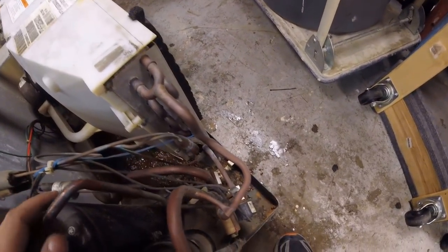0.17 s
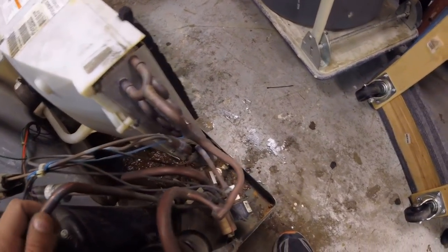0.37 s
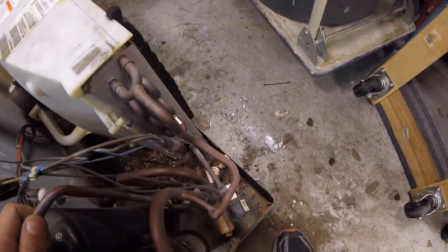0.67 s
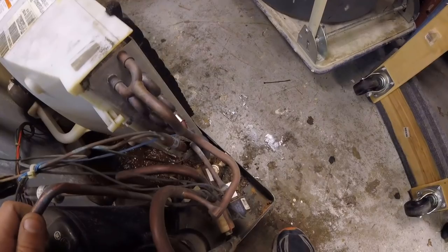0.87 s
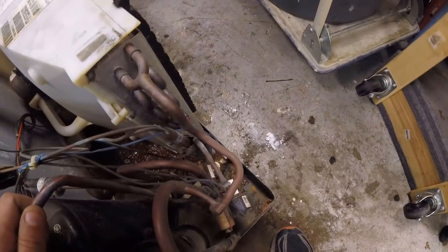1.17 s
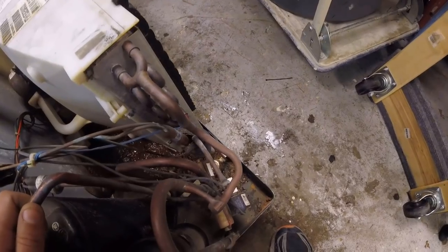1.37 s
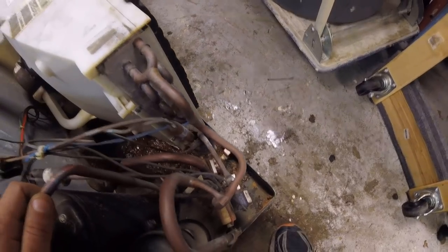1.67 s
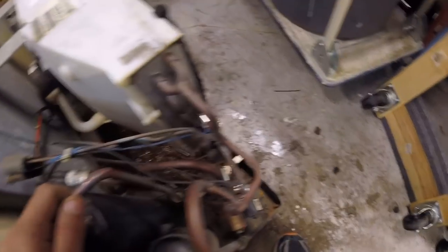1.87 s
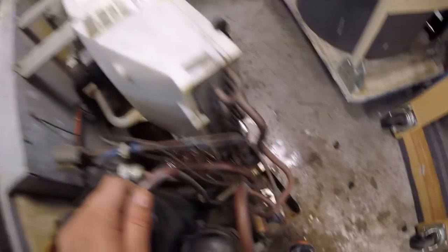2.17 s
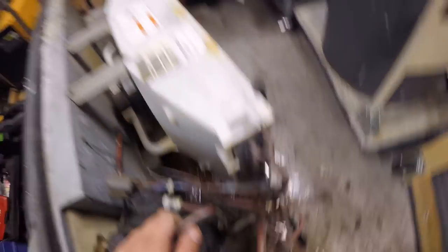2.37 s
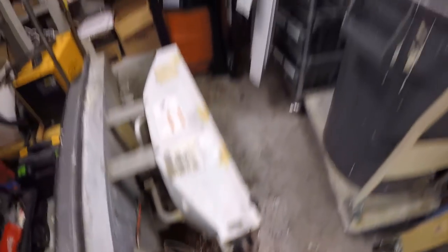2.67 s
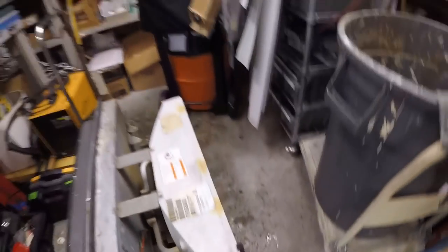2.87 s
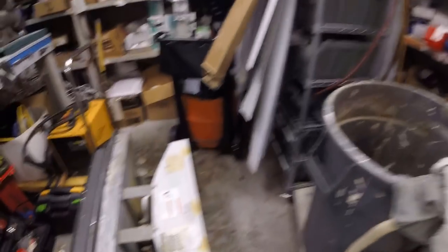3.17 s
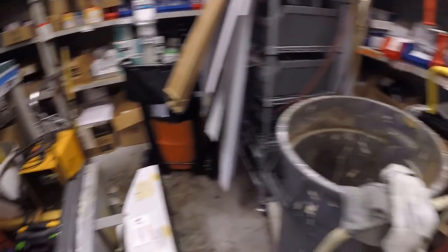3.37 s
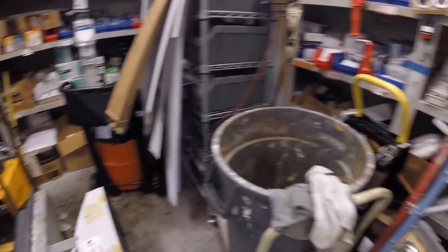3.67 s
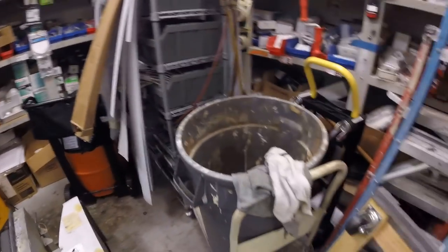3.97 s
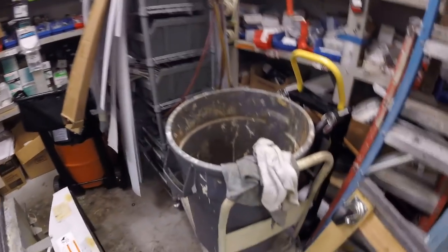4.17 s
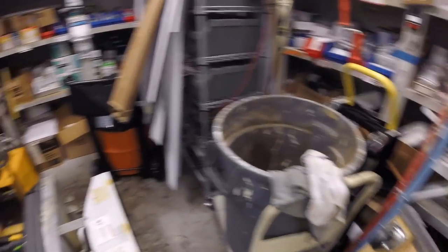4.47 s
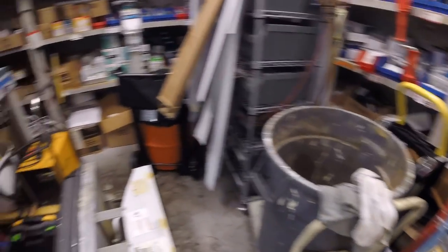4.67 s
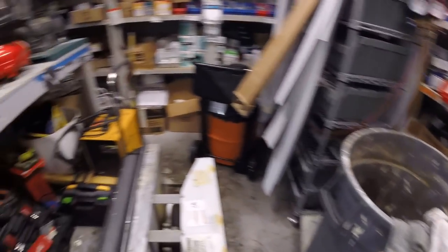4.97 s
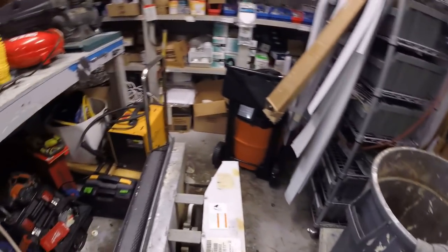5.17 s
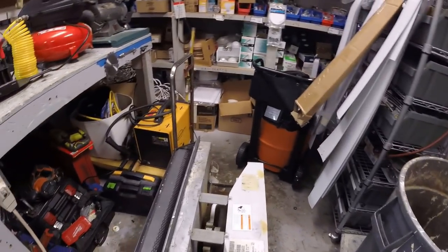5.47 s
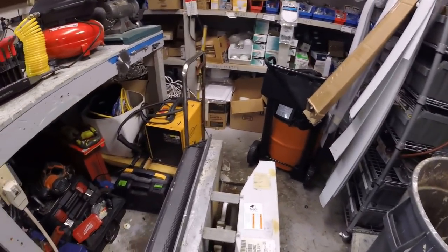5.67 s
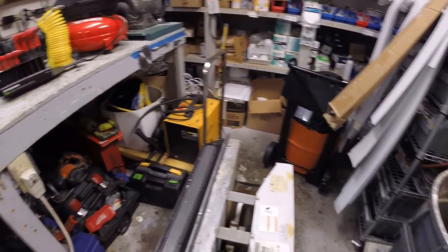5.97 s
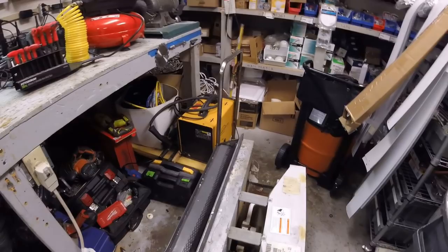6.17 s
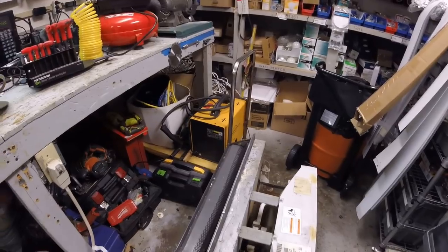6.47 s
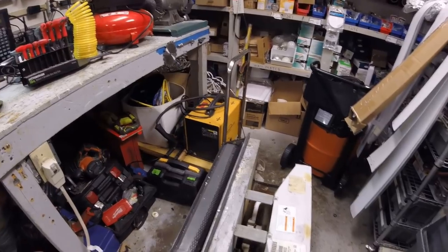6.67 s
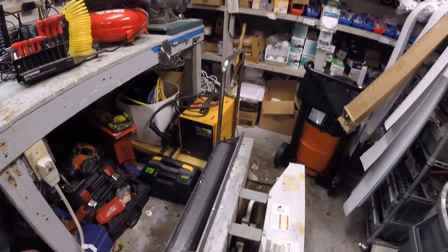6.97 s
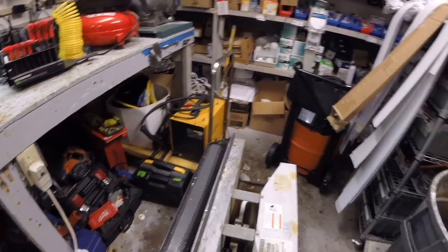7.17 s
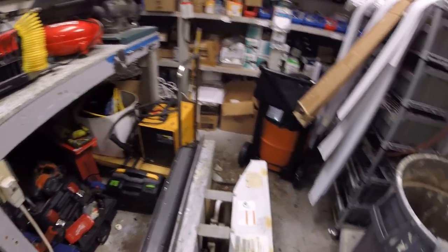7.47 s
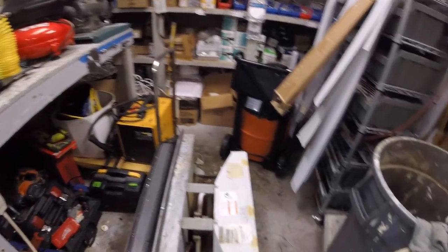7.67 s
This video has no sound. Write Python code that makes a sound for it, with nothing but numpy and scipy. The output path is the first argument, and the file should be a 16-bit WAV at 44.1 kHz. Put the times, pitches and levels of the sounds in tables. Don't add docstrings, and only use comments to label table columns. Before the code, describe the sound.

An opened air conditioner runs continuously for about 7.8 seconds on a workshop floor. Its fan makes a low, rough hum throbbing about 27 times a second; the compressor adds a faster buzz near 58 strokes a second, its valve blows ringing copper pipes and steel shell with a hard metallic rattle. Broad air rush and a finer pulsing hiss surround both. From 0 to 1.8 seconds the head-worn microphone is bent close, the sound bright and detailed. Between 2 and 3 seconds it rises: the timbre slides, a faint airy swish peaks near 2.7, and a tiny soft wind puff lands around 2.85, letting in a trace of low rumble that fades over the next seconds. From 3 to 5 seconds, turned aside, the pipe ring changes colour and the rattle is softer. After 5.25, standing, the drone stays steady, slightly duller, wavering subtly to the end.

```python
import sys
import numpy as np
from scipy import signal
from scipy.fft import rfft, irfft
from scipy.io import wavfile
from scipy.ndimage import uniform_filter1d, map_coordinates

SR = 44100
rng = np.random.default_rng(int(sys.argv[2]) if len(sys.argv) > 2 else 0)


def wrap_up_sound(samples):
    columns = np.atleast_2d(samples).T
    tamed = np.clip(columns, -1, 1)
    steps = np.round(tamed * 32767).astype(np.int16)
    wavfile.write(sys.argv[1], SR, steps)


def invert_db(x):
    u = np.asarray(x, float) / 20
    return 10 ** u


N = 344421
T = np.arange(N) / SR
FAN_HZ, PUMP_HZ = 27.24, 58.39
SHELL_DB = (-38.5, -39, -43, -43.5)


# multiple of the turning rate,
# then level in dB bent over, rising, turned aside, standing.
BLADES = [(5, -17.5, -29, -15.5, -22.5), (6, 1, -1, -3, -4), (7, -2.5, 0, -34, -30),
          (8, -26, -7.5, -9.5, -3.5), (9, 3, 1.5, 1.5, 0.5), (10, 1, 1, -3.5, 5.5),
          (11, -38, -26, -44, -34), (12, -3.5, -3, -1.5, -0.5), (13, -29, -24, -22, -17),
          (14, -11, -13, -12, -36), (15, -27, -15, -8.5, -8.5), (16, -32, -30, -15.5, -29),
          (17, -23, -32, -11.5, -47), (18, -8.5, -18, -26, -29)]


def fan():
    table = np.array(BLADES)
    orders = np.arange(len(table)) + 5
    delay_turns = -0.045 * orders + 0.0052 * (orders - 9) ** 2
    bunch = np.exp(-2j * np.pi * delay_turns)

    def voice(place):
        return by_place(table[:, 1:], place) * bunch

    throb = turning(orders, voice, FAN_HZ, echo=.2, unsteady=.002)[1]
    level_db = heard((-26, -24.5, -28, -24.5)) - 3.0 + 0.14 * wobble(8.5)
    return invert_db(level_db) * throb


# frequency in Hz, width in
# Hz, then level in dB bent over, rising, turned aside, standing.
MODES = [(610, 54, -17, -23, -2, -17), (700, 60, 6, -1, 8, 5.5), (884, 190, 2, 0.5, -4, -10),
         (1050, 62, -6, 1, 4.5, 0.5), (1106, 58, 10.5, 8.5, 6.5, 2), (1226, 166, 5, 5, 3.5, -3.5),
         (1613, 200, -3, -3.5, -1.5, -4), (1930, 88, -1, -10, -3, -11), (2167, 85, 3, -1.5, 0, -4),
         (2395, 170, 1, -4.5, -4, -7), (2926, 210, -2, -3, -1.5, -6),
         (3255, 90, -10, -5, -2, -2), (3330, 110, -6, -8, -8, -10), (3595, 103, 1, 3, 6.5, -4),
         (3628, 130, 2.5, 3, -14, -8.5), (3775, 110, 5, -11, -9, 2.5), (3863, 100, -2.5, -3, 2, 4),
         (4043, 90, 1, -1, 5, 0.5), (4235, 132, 4.5, -9, -1, -6), (4314, 35, -21, -7, -10, -14),
         (4580, 100, -4, -7, -7, -5.5), (4900, 200, -9, -22, -13, -37), (5146, 143, -2, -10, -14, -9),
         (6230, 190, -10.5, -16, -12, -16), (6670, 160, -19.5, -20, -19, -19.5)]
# frequency in Hz, moment in the stroke in turns.
STRIKES = [(1400, -.12), (1900, -.42), (2600, -.38), (3400, -.19), (3700, -.09), (4400, .08), (7000, 0)]


def compressor():
    hz, width, *levels_db = np.transpose(MODES)[:, :, None]
    levels_db = np.hstack(levels_db)
    orders = np.arange(8, 125)
    f = PUMP_HZ * orders
    resonance = (1 + (2 * (f - hz) / width) ** 2) ** -2
    moment = curves(STRIKES, f)[0]
    delay = np.exp(-2j * np.pi * np.cumsum(moment))

    def voice(place):
        power = by_place(levels_db, place) ** 2 @ resonance
        return struck(np.sqrt(power)) * delay

    stroke, tone = turning(orders, voice, PUMP_HZ, echo=.36, unsteady=.0005)
    return stroke, invert_db(heard(SHELL_DB) + 3.5 + 0.62 * wobble(12)) * tone


# frequency in Hz,
# level in dB per Hz bent over, level in dB per Hz standing.
AIR = [(112, -57, -56), (143, -1.5, -4), (264, 1.5, 1), (525, -6.5, -9), (715, -7, -10), (960, -9, -13.5),
       (1410, -15, -17), (2470, -20, -22), (3770, -25, -25), (5070, -28, -30.5), (7070, -39.5, -40.5),
       (11000, -47.5, -47.5), (13100, -56, -56.5), (15201, -64, -63)]


def air(stroke):
    hz, near_db, far_db = np.transpose(AIR)
    far = np.clip(camera()[0] / 1.9, 0, 1) * np.pi / 2
    flow = np.cos(far) * rush(hz, near_db, patchy_db=0.87)
    flow += np.sin(far) * rush(hz, far_db, patchy_db=0.92)
    gas_hz = [900, 1300, 2600, 4000, 5200, 7000, 9000]
    gas = rush(gas_hz, [-45, -8, -1.0, -6.5, -25.0, -12, -48], patchy_db=2.4)
    pulse_db = 4 * np.cos(2 * np.pi * (stroke + .01))
    gas = unit(gas * invert_db(pulse_db))
    breath_db = .5 * wobble(3)
    flow_db = heard((-34, -34, -35, -35.5)) + 4.0 + breath_db
    return invert_db(flow_db) * flow + invert_db(heard(SHELL_DB) - 10.5) * gas


# frequency in Hz, level in dB per Hz.
RUMBLE = [(15, -10), (40, 1.5), (70, -1), (110, 6), (140, -23.5)]
# time in seconds, frequency in Hz,
# half length in seconds, level in dB.
PUFFS = [
    (2.83, 163, 0.012, -16.5),
    (2.84, 40, .012, -40),
    (2.878, 35, .01, -38),
    (2.966, 45.4, 0.0096, -22.5),
]


def bass():
    rumble = unit(rush(*np.transpose(RUMBLE), patchy_db=1.5) * invert_db(1.8 * wobble(14)))
    blade = invert_db(-2.0) * np.sin(2 * np.pi * 3 * FAN_HZ * T)
    puffs = np.zeros(N)
    for s, hz, half, db in PUFFS:
        swell = np.exp(-.5 * ((T - s) / half) ** 2)
        puffs += invert_db(db) * swell * np.cos(2 * np.pi * hz * (T - s))
    return leak() * (rumble + blade) + puffs


GUSTS = [-1.3, 2.8]


def leak():
    open_db, shut_db, shutting_db_per_s2, spring_s = -48.5, -80, 3.5, 0.023
    since = T - np.array(GUSTS)[:, None]
    opening = np.clip(since / spring_s, 0, 1)
    closing = invert_db(open_db - shutting_db_per_s2 * since ** 2)
    return invert_db(shut_db) + np.max(opening * closing, axis=0)


# frequency in Hz, level in dB per Hz.
SWISH = [(700, -28), (1300, -2), (1700, 4), (2500, -9), (3500, -14), (6000, -35)]


def swing():
    middle_s, half_s, level_db = 2.69, 0.13, -41.5
    swell = np.exp(-.5 * ((T - middle_s) / half_s) ** 2)
    return invert_db(level_db) * swell * rush(*np.transpose(SWISH), patchy_db=-0.5)


# time in seconds, place (0 bent over, 1 rising, 2 turned aside, 3 standing),
# extra path in metres, distance moved in room patterns.
CAMERA = [(0, 0, 0.056, 1), (1.8, 0, 0.026, 1.3), (2.1, 1, .05, 3), (2.5, 1, 0.25, 5.5), (3, 2, 0.6, 10),
          (3.6, 2, .65, 14), (4.3, 2, 0.68, 15), (4.9, 2.2, .65, 19), (5.25, 3, 0.4, 21), (7, 3, 0.4, 22),
          (7.8, 3, 0.5, 23)]


def camera(t=T):
    return curves(CAMERA, t)


# time in seconds, level in dB.
SHADE = [(0, 0), (.8, 0), (1.1, 0), (1.4, .5), (1.9, -.5), (2.5, 0), (2.8, -0.5), (3.1, -1), (3.5, -1.5),
         (4.1, 0), (4.4, 0.5), (4.6, 2), (5.4, 1), (6, 1), (6.7, 0), (7.4, -1.5), (7.8, 0.5)]


def heard(levels_db):
    return np.interp(camera()[0], range(4), levels_db) + curves(SHADE)[0]


def turning(orders, voice, speed_hz, echo, unsteady):
    knots = np.arange(0, N / SR + .2, 1 / 8)
    place, _, moved = camera(knots)
    pattern = rng.standard_normal((2, 24, len(orders)))
    here = [[np.interp(moved, np.arange(24), p) for p in part.T] for part in pattern]
    gain, phase_shift = np.array(here)
    room = np.exp(echo * (gain / 4 + 1j * phase_shift)).T
    spectrum = np.zeros((len(knots), 4097), complex)
    spectrum[:, orders] = voice(place) * room
    turn = irfft(spectrum)
    turn /= turn.std(axis=1, keepdims=True)
    arrival = T - camera()[1] / 343
    phase = (speed_hz * arrival + unsteady * wobble(6)) % 1
    return phase, map_coordinates(turn, [T * 8, phase * 8191], order=1)


def struck(gain):
    cepstrum = irfft(np.log(gain))
    half = cepstrum.shape[1] // 2
    causal = np.r_[1, np.full(half - 1, 2), 1, np.zeros(half - 1)]
    return np.exp(rfft(cepstrum * causal))


def by_place(levels_db, place):
    return invert_db(np.transpose([np.interp(place, range(4), row) for row in levels_db]))


def rush(hz, db, patchy_db):
    f, _, z = signal.stft(rng.standard_normal(N + 2048), SR, nperseg=2048)
    field = uniform_filter1d(rng.standard_normal(z.shape), size=16, axis=0)
    field = uniform_filter1d(field, size=3, axis=1)
    colour = np.interp(np.log(f + 1), np.log(hz), db, left=-120, right=-120)
    gain_db = colour[:, None] + patchy_db * unit(field)
    return unit(signal.istft(z * invert_db(gain_db), nperseg=2048)[1][:N])


def wobble(rate):
    return map_coordinates(rng.standard_normal(int(N * rate / SR) + 4), [T * rate])


def curves(rows, t=T):
    s, *cols = np.transpose(rows)
    return [np.interp(t, s, c) for c in cols]


def unit(x):
    return x / np.sqrt(np.mean(x ** 2) + 1e-20)


def scene():
    stroke, shell = compressor()
    return np.tile(fan() + shell + air(stroke) + bass() + swing(), (2, 1))


# lower edge in Hz, share of frames.
FLIPPED = [(4594, .2), (5062, .08), (5625, .36), (6188, .36), (6844, .26), (7500, 0.13), (8250, 0.29),
           (9000, 0.25), (9750, 0.13), (10500, 0.097), (11250, 0.047), (12000, 0)]


def flipped_bands(mono):
    edge_hz, share = np.transpose(FLIPPED)
    f, t, z = signal.stft(mono, SR, window="cosine", nperseg=1882)
    luck = rng.random((len(share), len(t)))
    common = rng.random(len(t))
    flip = luck < 1.8 * share[:, None] * common
    band = np.searchsorted(edge_hz, f) - 1
    chosen = flip[band] * (band >= 0)[:, None]
    return signal.istft(z * chosen, window="cosine", nperseg=1882)[1][:N]


def roll_off(x):
    return signal.sosfilt(signal.butter(12, 15140, fs=SR, output="sos"), x)


def record(dry):
    right = dry[1] - 2 * flipped_bands(dry[0])
    return roll_off(np.array([dry[0], right]))


dry = scene()
out = record(dry)
wrap_up_sound(out)
```